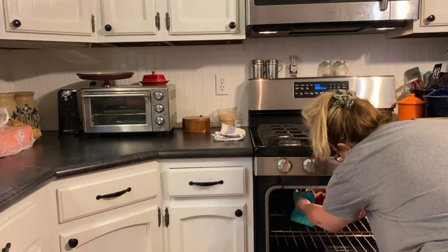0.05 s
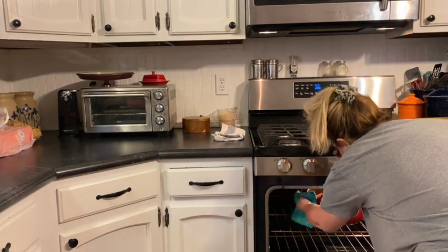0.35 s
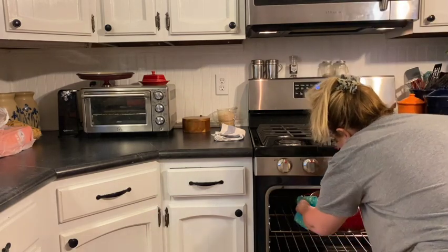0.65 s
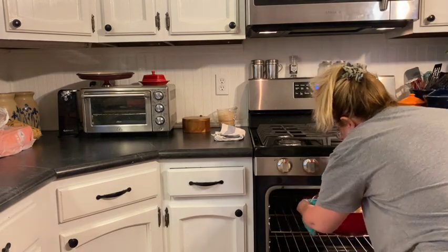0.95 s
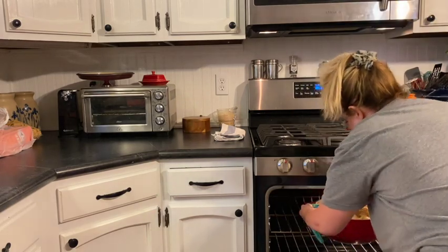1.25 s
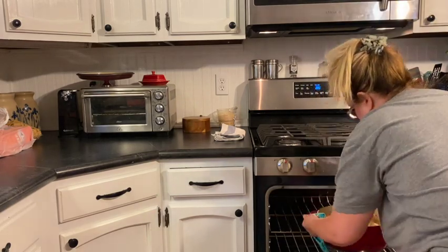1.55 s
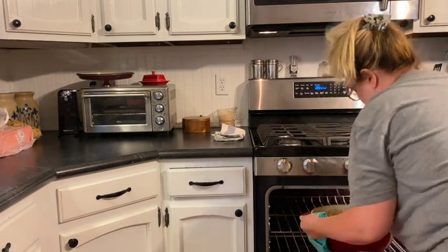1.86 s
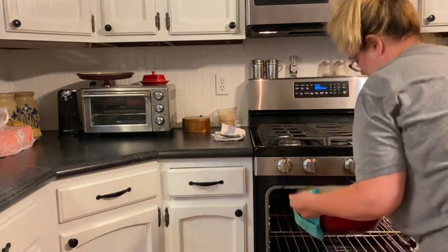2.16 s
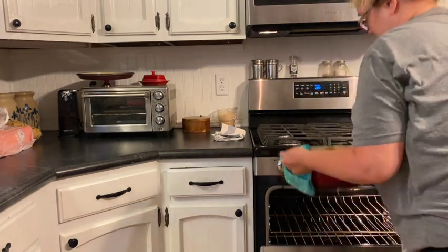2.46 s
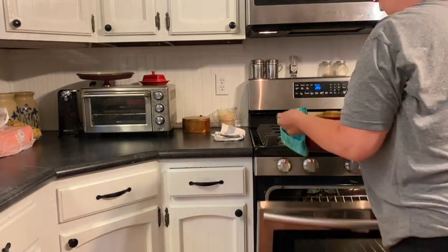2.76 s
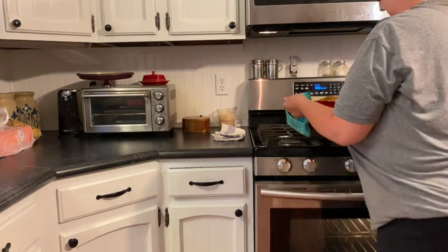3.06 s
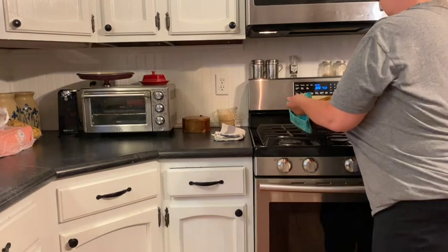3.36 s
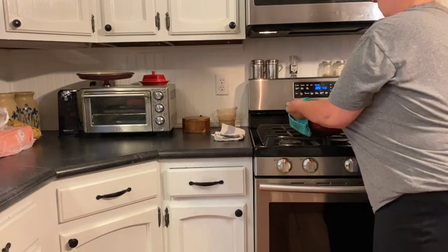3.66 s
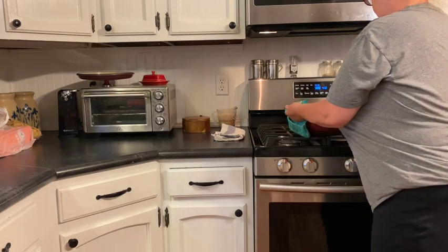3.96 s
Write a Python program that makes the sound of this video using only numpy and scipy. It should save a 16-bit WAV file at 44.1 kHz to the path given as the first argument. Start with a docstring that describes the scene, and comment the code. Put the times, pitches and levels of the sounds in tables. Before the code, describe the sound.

An oven door bangs shut in a small kitchen. First a pot scrapes and clanks off the metal rack, then the hinges scrape, the door slams and rattles, and the pot lands on the stove grate, heard close by.

```python
"""A small, hard kitchen, an appliance humming, heard on a stereo microphone pair within reach of the
oven's direct sound. A pot is dragged off the oven rack, rubbing and bumping; the rack clanks and rings on.
The door swings up on scraping hinges and bangs shut, shaking its panels and racks; then the pot lands
on the stove grate. Each blow is a chattering click that sets a body ringing; each scrape is a stream
of tiny slips."""
import sys
import numpy as np
from scipy import signal
from scipy.io import wavfile

SR = 44100
rng = np.random.default_rng(int(sys.argv[2]) if len(sys.argv) > 2 else 0)


def log_audio(samples):
    """Write samples as a 16-bit WAV file to the path given in sys.argv[1]."""
    # one column per channel
    frames = np.atleast_2d(samples).T
    # limit to full scale, then quantise
    limited = np.clip(frames, -1, 1)
    pcm = np.round(limited * 32767).astype(np.int16)
    wavfile.write(sys.argv[1], SR, pcm)


N = 176400
TIME = np.arange(N) / SR

# Table levels are relative; a decay time is the time to fall 60 dB.
# The microphone pair. Each row: frequency in Hz, likeness of the channels (0-1), left minus right in dB.
MIC_PAIR = [(59, 1, 2.5), (121, 0.88, -5.5), (258, 0.9, -2.5), (440, 0.47, -1.5), (840, 0.061, 0.5),
            (1630, 0.31, 0), (2960, 0.6, 3), (6560, 0.49, 0.6), (11000, 0.018, 0)]
# The appliance's hum. Each row: frequency in Hz, level in dB.
HUM_PARTIALS = [(59.5, -58), (119.6, -49.5), (183, -58), (239, -75), (296, -62.5), (356, -67.5)]
# Noise of the air, the rubbing and the hinges. Each row: frequency in Hz, spectral density in dB.
AIR_SPECTRUM = [(25, -43), (55, 2), (100, 0), (200, -3.5), (450, -4.5), (700, -10), (1200, -30),
                (3000, -26), (7000, -35.5), (15000, -44)]
HISS_SPECTRUM = [(500, -56), (1500, 4), (4000, -0.5), (6000, 2), (8000, -12.5), (15000, -6)]
SCRAPE_SPECTRUM = [(100, -4), (180, 6.5), (400, 0.5), (900, -2.5), (2000, -35), (5000, -50)]
HINGE_SPECTRUM = [(80, 12), (250, -1), (480, 6.5), (800, 3), (2000, -4), (3500, -18), (7000, -33.5),
                  (15000, -49)]
# Pot and cloth mitts rubbing. Each row: time in seconds, hiss level in dB, scrape level in dB.
RUB_LEVELS = [(0, -65, -76), (.22, -70, -78.5), (.3, -56.5, -52.5), (.45, -51.5, -61), (.55, -57, -51),
              (.68, -55.5, -65), (.77, -63, -51), (.82, -58, -51), (.98, -59.5, -53), (1.08, -54, -48),
              (1.2, -55, -50.5), (1.37, -49.5, -43.5), (1.5, -59, -54), (1.75, -69, -49), (1.9, -61.5, -59),
              (2.31, -75, -64), (2.328, -54, -44.5), (2.37, -78, -64), (2.56, -65, -53.5),
              (3.7, -76, -48.5)]
# The hinges' scrape through the swing. Each row: time in seconds, level in dB.
HINGE_LEVELS = [(2.68, -55.5), (2.78, -45), (2.87, -46.5), (2.91, -40.5), (2.945, -36), (3.02, -34.5),
                (3.07, -44), (3.13, -53), (3.22, -48)]

# Soft shoves on the cabinet from pot or door. Each row: start in seconds, level in dB, length in seconds.
CABINET_SHOVES = [(0.739, -50, 0.0032), (2.722, -33, 0.0032), (2.748, -35.5, 0.0068),
                  (2.878, -26.5, 0.0094), (2.972, -39, 0.0048), (3.231, -15, 0.0042), (3.25, -12.5, 0.014),
                  (3.27, -20, 0.0036), (3.299, -11.5, 0.01), (3.324, -30, 0.0045), (3.397, -34, 0.007),
                  (3.527, -33, 0.0074), (3.884, -37, 0.0037), (3.943, -42, 0.0056), (3.990, -32, 0.0051)]
# Soft bumps of the sliding pot. Each row: start in seconds, level in dB, contact brightness in Hz.
POT_BUMPS = [(.738, -30, 127), (.915, -37.5, 110), (1.222, -44, 305), (1.358, -37, 300)]
# Hard blows. Each row: start in seconds, level in dB, contact brightness in Hz, chatter fade in seconds.
POT_ON_RACK = [(.812, -43, 1410, .014), (1.282, -42, 4500, 0.037), (1.395, -28.5, 15000, 0.0056),
               (1.402, -27.5, 13900, .004), (1.416, -33.5, 6940, 0.0089), (1.457, -33, 6500, 0.0054),
               (1.515, -38, 2500, 0.019)]
POT_ON_GRATE = [(3.8305, -26, 10200, 0.0017), (3.843, -34, 9100, .012), (3.86, -31, 8000, .012),
                (3.888, -27, 4400, 0.0079), (3.912, -31.5, 2500, 0.0099), (3.943, -32.5, 15000, .004),
                (3.972, -25, 13000, .004), (3.98, -29, 11000, .005), (3.993, -24, 3000, 0.0066)]
CATCH_CLICKS = [(2.85, -43, 14600, 0.0016), (2.933, -46, 10000, .003), (2.985, -44.5, 8000, .03),
                (3.2145, -33.5, 14200, 0.0027), (3.218, -24.5, 13500, 0.0024), (3.29, -25.5, 9300, 0.028),
                (3.408, -44, 13000, .02), (3.542, -36.5, 6400, 0.017)]
DOOR_KNOCKS = [(2.693, -39, 1800, 0.01), (2.716, -37.5, 800, 0.0051), (2.739, -41.5, 1200, .008),
               (2.872, -33, 304, 0.011), (2.889, -39, 1840, 0.0058), (2.934, -36.5, 3020, 0.0086),
               (3.225, -20, 600, 0.011), (3.246, -18, 1330, 0.025), (3.269, -19.5, 1710, 0.0074),
               (3.285, -16.5, 3300, 0.0029), (3.294, -18, 3900, 0.0065), (3.307, -21.5, 3900, 0.015),
               (3.32, -25, 464, 0.0027), (3.367, -20.5, 1300, 0.009), (3.384, -24.5, 2460, 0.0088),
               (3.418, -24, 3670, 0.0088), (3.455, -35, 2480, 0.0041), (3.48, -36.5, 2400, 0.0054),
               (3.525, -29.5, 870, 0.01), (3.66, -26.5, 325, 0.0015)]

# The clear modes of each body. Each row: frequency in Hz, level in dB, decay time in seconds.
CABINET_TONES = [(49.3, -6, 0.37), (60, -5, 0.34), (77.8, -4, 0.53), (107, -11, 0.18), (119, 0.5, 0.25),
                 (160.6, 0, 0.23)]
OVEN_WALL_TONES = [(59.4, -10, 0.72), (84, -4.5, 0.2), (110.5, 3, 0.39), (170.4, -3.5, 0.37)]
RACK_TONES = [(198, -21, 5.6), (292.5, -12.5, 2.7), (312, -14.5, 0.66), (353, -12, 0.92), (1467, -15, 0.42),
              (1557, -17, 0.94), (1639, -14.5, 1.2), (1680, -19, 1.3), (1793, -16, .9), (2040, -10.5, 0.57),
              (2210, -9, 0.39), (2353, -26, 1.8), (2810, -16, 0.83), (2805, -26, 2.3), (3400, -26, 0.39),
              (4020, -27, 1.5), (4215, -25, 1.9), (4470, -29, 1.4), (6830, -20.5, 0.87), (7700, -25, 1.4)]
POT_TONES = [(124.7, -12.5, 0.41), (212, -17, 0.48), (296.5, -12, 0.76), (363, -11.5, 0.95),
             (490, -9, 0.95), (630, -11, 0.33), (720, -9.5, 0.34), (882, -10.5, .48), (1180, -10, .5),
             (1800, -16, .44), (2720, -11.5, 0.25), (2890, -13, 0.2), (3730, -19, .4), (5250, -27, 0.17)]
DOOR_TONES = [(124.5, -10.5, 0.2), (187.7, -11, .3), (299, -9, 0.52), (346, -10.5, 0.38),
              (491, -13.5, 0.51), (588, -11.5, 0.65), (609, -17, 0.26), (643, -9, 0.22), (746, -8, 0.3),
              (933, -10.5, 0.46), (982, -14, 0.36), (1062, -15, .4), (1186, -19.5, 0.73), (1360, -25, 0.26),
              (1570, -17, 0.36), (1866, -23, 0.33)]
# Each body's dense ring in the room.
# Each row: frequency in Hz, spectral density in dB, decay time in seconds.
RACK_DENSE_RING = [(101, -13, .5), (298, 4, 0.27), (700, -2, 0.85), (1170, 4.5, 0.36), (2020, -1, 0.44),
                   (4020, -4, 0.45), (6900, -11, 0.46), (10900, -21.5, 0.33), (15000, -13, 0.12)]
POT_DENSE_RING = [(60, -2, 0.49), (197, -2.5, 0.73), (640, 5, 0.66), (1310, -.5, 0.58), (2820, -5.5, 0.39),
                  (4940, -11, 0.77), (8000, -23.5, 1), (14700, -28.5, 0.95)]
CATCH_DENSE_RING = [(300, -30, .3), (1480, -1, 0.83), (3000, -4.5, 0.35), (7100, -8, 0.47),
                    (10500, -24.5, 0.12), (14700, 6, 0.31)]
DOOR_DENSE_RING = [(50, 1.5, 0.46), (150, -5.5, 0.49), (398, 2.5, .6), (850, -2, 0.52), (1600, -4.5, 0.46),
                   (3520, -12.5, 0.42), (7050, -14.5, 0.73), (15000, -19, 0.19)]

AIR_DB, CABINET_DB, RACK_DB, POT_DB, CATCH_DB, DOOR_DB = -49, -1.5, -3.5, -1, -3, -1.5
DIRECT_DB = 16.5  # the direct click against the noise of the ring
CHATTER_PER_S, CHATTER_DB = 1800, -8.5
RUB_GRAINS_PER_S, HINGE_SLIPS_PER_S = 5000, 700
SHIMMER_PER_S = 55  # beating of close modes at 1 kHz, faster higher up
LOW_CUT_HZ, HIGH_CUT_HZ = 36, 16100
BAND_HZ = 22 * 2 ** (np.arange(19) / 2 + 1 / 4)
BAND_EDGES = 2 ** np.array([-1 / 4, 1 / 4])
BAND_FILTERS = [signal.butter(2, hz * BAND_EDGES, "band", fs=SR, output="sos") for hz in BAND_HZ]


def from_db(db):
    """Decibels to gain."""
    return 10 ** (np.asarray(db) / 20)


def rms(x):
    """Root mean square."""
    return np.sqrt(np.mean(x ** 2) + 1e-20)


def at_hz(rows, hz):
    """The columns of a table at one frequency."""
    row_hz, *columns = np.transpose(rows)
    return [np.interp(np.log(hz), np.log(row_hz), column) for column in columns]


def gains_in_time(rows):
    """The dB columns of a curve as gains per sample."""
    seconds, *columns = np.transpose(rows)
    return [from_db(np.interp(TIME, seconds, column)) for column in columns]


def wander(t, per_s):
    """Slow random complex motion of unit power."""
    knots = np.arange(1500) / per_s
    motion = np.interp(t, knots, rng.standard_normal((len(knots), 2)) @ [1, 1j])
    return motion / rms(np.abs(motion))


def pan(hz):
    """Gain at the left and right microphone for one frequency."""
    return from_db(at_hz(MIC_PAIR, hz)[1] * np.array([[.5], [-.5]]))


def diffuse_bands(size, click=0):
    """Half-octave bands of diffuse noise at the microphones, led by a direct click if one is given."""
    white = rng.standard_normal((2, 2, size))
    for k, hz in enumerate(BAND_HZ):
        alike = np.clip(at_hz(MIC_PAIR, hz)[0], 0, .995)
        mid, side = white[k % 2]
        pair = np.sqrt((1 + alike) / 2) * mid + np.sqrt((1 - alike) / 2) * side * [[1], [-1]]
        pair[:, 0] += click * (-1) ** k
        yield hz, pan(hz) * signal.sosfilt(BAND_FILTERS[k], pair)


def body_response(ring):
    """One click on a body, heard at the microphones: direct sound, then a dense ring dying by band."""
    t = TIME[:SR // 2]
    out = 0
    for hz, band in diffuse_bands(len(t), click=from_db(DIRECT_DB)):
        db, t60 = at_hz(ring, hz)
        out = out + band * from_db(db - 60 * t / t60)
    return out / rms(out[:, :SR // 40])


def excite(force, response):
    """A force played through a body."""
    return signal.fftconvolve(force[None], response, axes=1)[:, :N]


def friction(gain, spectrum, per_s, uneven_db, t60):
    """Many small slips of uneven size, each ringing briefly in the room."""
    slips = (rng.random(N) < per_s / SR) * rng.choice([-1, 1], N)
    slips = slips * from_db(uneven_db * np.minimum(rng.exponential(1, N), 4))
    response = body_response([(hz, db, t60) for hz, db in spectrum])
    return excite(gain * slips / rms(slips), response * np.sqrt(2) / np.linalg.norm(response))


def contact(bright_hz, chatter_s):
    """A click and a dying chatter of smaller ones, dulled by the softness of the contact."""
    t = TIME[:SR // 8]
    clicks = (rng.random(len(t)) < CHATTER_PER_S / SR) * rng.choice([-1, 1], len(t))
    force = clicks * from_db(CHATTER_DB) * np.exp(-t / chatter_s)
    force[0] = 1
    softness = signal.butter(2, min(bright_hz, SR * 4 / 9), fs=SR, output="sos")
    return signal.sosfilt(softness, force / np.linalg.norm(force) + 1e-18)


def clatter(blows, ring, spot_count=4):
    """Blows fall in turn on several spots of a body, each with a dense ring of its own."""
    spots = [body_response(ring) for _ in range(spot_count)]
    out = np.zeros((2, N + SR))
    for k, (start_s, db, bright_hz, chatter_s) in enumerate(blows):
        knock = excite(contact(bright_hz, chatter_s), spots[k % spot_count])
        start = int(start_s * SR)
        out[:, start:start + knock.shape[1]] += from_db(db) * knock
    return out[:, :N]


def ringing_modes(blows, modes, shimmer):
    """Each blow feeds energy into the modes, which shimmer as they die away."""
    start_s, db, bright_hz = np.transpose(blows)[:3]
    onsets = np.minimum((start_s * SR).astype(int), N - 1)
    start, out = onsets.min(), np.zeros((2, N))
    for hz, mode_db, t60 in modes:
        t = TIME[start:onsets.max() + 1 + int(t60 * SR * 2 / 3)]
        feed = np.zeros(len(t))
        feed[onsets - start] = from_db(db + mode_db) ** 2 / (1 + (hz / bright_hz) ** 4)
        energy = signal.lfilter([1], [1, -from_db(-60 / (t60 * SR)) ** 2], feed)
        swell = np.exp(-hz / SR)  # the tone rises over about one cycle
        envelope = signal.lfilter([1 - swell], [1, -swell], np.sqrt(energy))
        beats = (1 + shimmer * wander(t, SHIMMER_PER_S * np.sqrt(hz / 1000))) / np.hypot(1, shimmer)
        mic_phase = np.arccos(np.clip(at_hz(MIC_PAIR, hz)[0], 0, 1)) * rng.choice([-1, 1])
        tone = envelope * beats * np.exp(2j * np.pi * (hz * t + rng.random()))
        out[:, start:start + len(t)] += pan(hz) * np.real([tone, tone * np.exp(1j * mic_phase)])
    return out


def struck(blows, ring, modes, shimmer):
    """A body under a series of blows: dense clatter plus clear tones."""
    return clatter(blows, ring) + ringing_modes(blows, modes, shimmer)


def room_tone(waver_rad=0.12):
    """A slightly wavering appliance hum over moving air."""
    air = sum(band * from_db(at_hz(AIR_SPECTRUM, hz)[0]) for hz, band in diffuse_bands(N))
    knots = np.linspace(0, N / SR, 25)
    hum = 0
    for hz, db in HUM_PARTIALS:
        drift = waver_rad * np.interp(TIME, knots, rng.standard_normal(len(knots)))
        hum = hum + pan(hz) * from_db(db) * np.sqrt(2) * np.sin(2 * np.pi * hz * TIME + drift)
    return hum + from_db(AIR_DB) * air / rms(air)


def cabinet_boom():
    """Soft half-sine pushes set the oven's big panels booming."""
    force = 0
    for start_s, db, length_s in CABINET_SHOVES:
        push = np.sin(np.pi * np.clip((TIME - start_s) / length_s, 0, 1))
        force = force + from_db(db) * push * np.pi / (2 * length_s * SR)  # the level sets the impulse
    t = TIME[:SR]
    panels = sum(pan(hz) * from_db(db - 60 * t / t60) * np.sin(2 * np.pi * hz * t)
                 for hz, db, t60 in CABINET_TONES)
    return -from_db(CABINET_DB) * excite(force, panels)


def pot():
    """The pot rubs along the rack, booms the oven's walls, knocks free and lands on the grate."""
    hiss_gain, scrape_gain = gains_in_time(RUB_LEVELS)
    grip = from_db(1.7 * wander(TIME, per_s=19).real)  # uneven pressure of the hands
    hiss = friction(hiss_gain * grip, HISS_SPECTRUM, RUB_GRAINS_PER_S, uneven_db=6.5, t60=0.15)
    scrape = friction(scrape_gain, SCRAPE_SPECTRUM, RUB_GRAINS_PER_S, uneven_db=3.5, t60=0.27)
    rack = from_db(RACK_DB) * struck(POT_ON_RACK, RACK_DENSE_RING, RACK_TONES, shimmer=1.5)
    walls = ringing_modes(POT_BUMPS, OVEN_WALL_TONES, shimmer=0.81)
    landing = from_db(POT_DB) * struck(POT_ON_GRATE, POT_DENSE_RING, POT_TONES, shimmer=0.56)
    return hiss + scrape + rack + walls + landing


def oven_door():
    """Hinges scrape, small steel catches click, the door bangs shut and its loose parts rattle."""
    hinge_gain, = gains_in_time(HINGE_LEVELS)
    hinges = friction(hinge_gain, HINGE_SPECTRUM, HINGE_SLIPS_PER_S, uneven_db=6.0, t60=0.32)
    catches = from_db(CATCH_DB) * clatter(CATCH_CLICKS, CATCH_DENSE_RING, spot_count=3)
    bang = from_db(DOOR_DB) * struck(DOOR_KNOCKS, DOOR_DENSE_RING, DOOR_TONES, shimmer=0.58)
    return hinges + catches + bang


def scene():
    """The kitchen as it reaches the microphone pair."""
    return room_tone() + pot() + oven_door() + cabinet_boom()


def record(dry):
    """The deepest bass is rolled off and the top is cut steeply."""
    low_cut = signal.butter(2, LOW_CUT_HZ, "high", fs=SR, output="sos")
    high_cut = signal.ellip(10, .2, 80, HIGH_CUT_HZ, fs=SR, output="sos")
    return signal.sosfilt(high_cut, signal.sosfilt(low_cut, dry))


dry = scene()
out = record(dry)
log_audio(out)
```